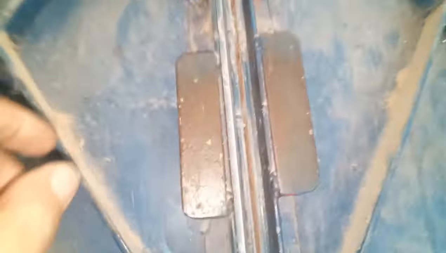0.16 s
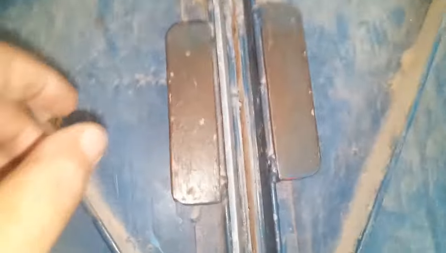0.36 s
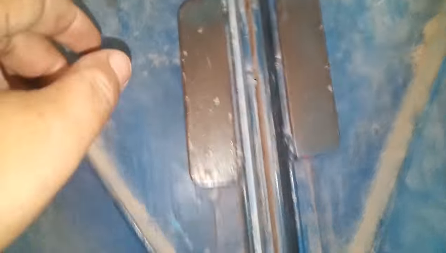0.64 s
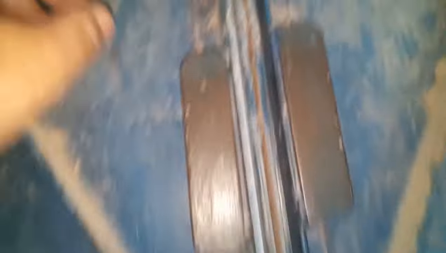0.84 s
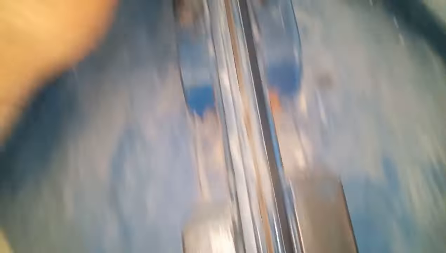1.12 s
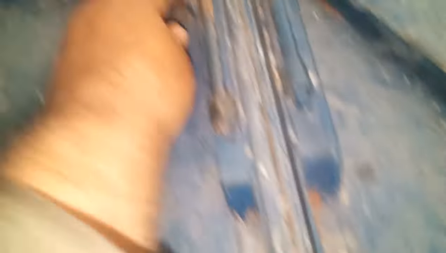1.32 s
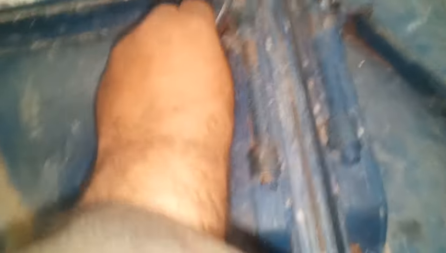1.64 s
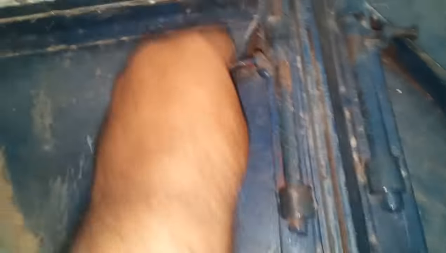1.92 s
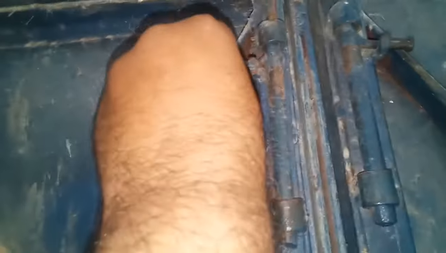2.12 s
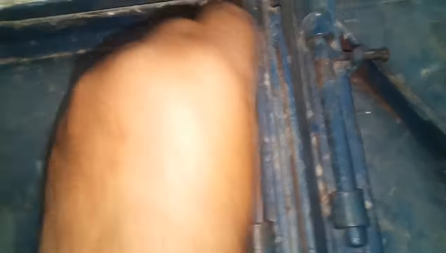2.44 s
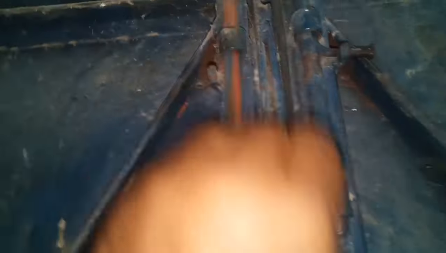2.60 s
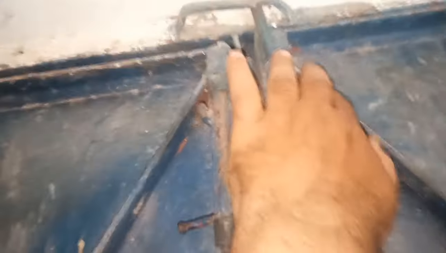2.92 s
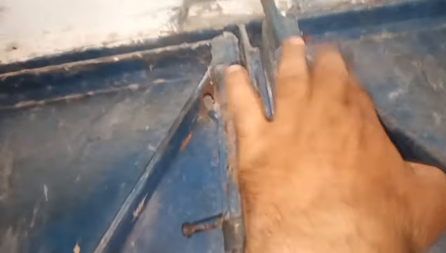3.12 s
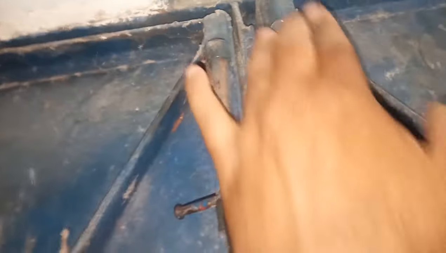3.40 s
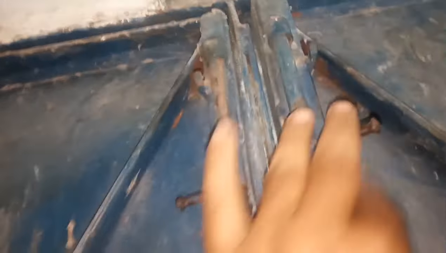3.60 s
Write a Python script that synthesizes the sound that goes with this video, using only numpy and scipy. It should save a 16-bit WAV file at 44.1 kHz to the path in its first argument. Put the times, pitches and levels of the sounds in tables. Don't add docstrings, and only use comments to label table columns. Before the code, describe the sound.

Rusty steel bolt on a sheet-metal door is knocked and scraped, rattling loudly with one squeal

```python
import sys
import numpy as np
from scipy import signal
from scipy.fft import rfft, irfft
from scipy.io import wavfile
from scipy.ndimage import uniform_filter1d, minimum_filter1d

SR = 44100
rng = np.random.default_rng(int(sys.argv[2]) if len(sys.argv) > 2 else 0)


def undo_db(level):
    steps = np.asarray(level, float) / 20
    return 10 ** steps


def wrap_up_sound(samples):
    columns = np.atleast_2d(samples).T
    tamed = np.clip(columns, -1, 1)
    steps = np.round(tamed * 32767).astype(np.int16)
    wavfile.write(sys.argv[1], SR, steps)


N = 165375
SCENE_CHANGE_S = 2.8105

# frequency in Hz, level in dB.
SHOP_TONE = [(40, -6), (100, 8), (300, -2), (1500, -8), (3600, -3), (5000, -18), (7000, -26), (16000, -28)]
# start in seconds, rise in seconds, hold in seconds,
# fall t60 in seconds, level in dB.
BRUSHES = [
    (.132, 0.0056, 0.033, 0.25, -56),
    (0.3548, 0.023, 0.016, 0.23, -32.5),
    (0.701, 0.042, 0.014, 0.18, -54),
    (0.85, 0.016, 0.092, 1.5, -64.5),
    (1.199, 0.0017, 0.016, 0.29, -40.5),
    (.59, .03, 0.05, 0.37, -68.5),
    (.156, 0.015, 0.084, 0.48, -40.5),
]
BRUSH_HZ = [2660, 3200, 1970, 3400, 2740, 2970, 2670]
# start in seconds, level in dB, pitch in Hz, t60 in seconds.
TAPS = [(0.231, -46, 163, 0.5), (.252, -44, 165, 0.6), (.252, -48, 600, .03), (0.599, -30, 420, 0.017),
        (0.635, -46, 220, .04), (.66, -53, 500, .02), (0.696, -53, 150, 0.05), (.735, -50.5, 300, 0.066),
        (.747, -47.5, 606, 0.048), (0.889, -49, 290, 0.037), (1.205, -49, 316, 0.42)]
# start in seconds, peak level in dB, rattle t60 in seconds,
# bass tilt in dB, treble tilt in dB.
BOLT_KNOCKS = [(1.443, -8, 0.39, 12.5, -15), (1.468, -8, 0.47, 10, -11), (1.545, -12, 0.19, 5, -1.5),
               (1.604, -5.5, 0.31, -2, 5), (1.634, -1, 0.21, -4.5, -23), (1.672, -8, 0.28, 5, -20),
               (1.739, -1.5, 0.17, -5.5, -10.5), (1.803, 2, 0.19, -2.5, 11), (1.831, -7, 0.26, 6, 16.5),
               (2.095, -3.5, 0.41, 3.5, 5.5), (2.173, -2, 0.16, -1.5, 16.5), (2.216, 3.5, 0.22, 1.5, 10.5),
               (2.47, -7, 0.17, -2.5, -8), (2.498, -8, 0.63, 0, -20.5), (2.609, -3.5, 0.3, -2, 0.5),
               (2.706, -1, 0.29, -22, 5.5), (2.718, -10.5, 0.24, -2, 28.5), (2.066, -44, .03, -10, 7.5)]
LEAF_KNOCKS = [
    (3.174, -1, 0.47, -6.5, -2.5),
    (3.2, -10.5, 0.98, 7, 4),
    (3.316, -5.5, 0.82, 3, -13.5),
    (3.383, -5.5, 0.25, 9, -27),
    (3.441, 0.5, 0.33, -3.5, -19),
    (3.487, -2.5, 0.13, -4, -18),
    (3.573, 0, 0.51, -1.5, 12),
]
# start in seconds, length in seconds, level in dB,
# bass tilt in dB, treble tilt in dB.
DRAGS = [(2.433, 0.04, -22, 0, -12), (2.612, 0.081, -8, 2, 4.5), (2.405, .04, -36, 6, -12),
         (3.32, .06, -17, 0, -6), (3.39, .045, -19, 0, -6), (2.47, .12, -23, 6.5, -6),
         (2.56, 0.058, -19, 7, -11), (1.446, .09, -14.5, 13.5, 4), (1.53, 0.066, -23, 4, 0),
         (2.708, .018, -10, -5.5, 6), (2.73, .09, -22, -3, 4), (2.225, 0.085, -20.5, 2.5, 3),
         (3.177, .04, -10.5, -6, 4), (3.45, .04, -17, -3, 2.5), (3.5, 0.045, -16, -5.5, -13),
         (1.33, 0.13, -43, 16.5, 13), (2.066, 0.03, -34, 26, -10), (3.149, .04, -33.5, 4, -15),
         (3.13, .03, -54, -6, -15), (2.95, .19, -58, 8, -17), (2.868, 0.1, -49, 6, -10),
         (3.0, 0.067, -50, 23, -15), (1.9, .17, -45, 24.5, -0.5)]
# start in seconds, level in dB, pitch in Hz, t60 in seconds.
FLEXES = [(1.447, -19, 168, 0.51), (1.448, -20.5, 400, .25), (1.81, -24, 163, .8), (2.225, -18, 272, .45),
          (2.27, -24.5, 165, .2), (2.465, -23.5, 268, 0.41), (2.59, -21, 265, .9), (2.645, -19, 265, .35),
          (1.61, -24, 765, .35), (1.675, -22, 770, .4), (2.47, -23, 745, .5), (3.38, -23, 265, .4),
          (2.9, -50, 165, 1.5), (2.6, -24.5, 166, 0.55), (2.73, -24.5, 165, 1), (3.316, -20.5, 262, 0.49),
          (2.38, -32, 105, .2), (2.1, -24, 320, .15), (1.545, -27, 90, 0.23), (1.74, -29, 90, 0.22)]
# frequency in Hz, level in dB, t60 in seconds.
BOLT_MODES = [(164.6, -4.5, 0.4), (233.6, -8, 0.28), (268, -3, 0.26), (326, -8, 0.09), (595, -18, 0.15),
              (725.4, -9.5, 0.13), (769.7, -6.5, 0.09), (1424, -17.5, .12), (1525, -19, .1),
              (1646, -19, 0.1), (2552, -20, 0.098), (3800, -16.5, 0.03), (8530, -17.5, 0.091),
              (13700, -24, .08)]
# frequency in Hz, level in dB, t60 in seconds.
LEAF_MODES = [(164, -7, 0.4), (264.2, -9, 0.15), (660, -14, 0.12), (1050, -6.5, 0.068), (1354, -23, 0.14),
              (1652, -12, 0.043), (2122, -21.5, 0.19), (2340, -13, 0.06), (2486, -12, 0.06),
              (2722, -16, 0.05), (2895, -17, 0.04), (4780, -20, 0.1), (7600, -24, .1)]
# frequency in Hz, level in dB.
BOLT_COLOUR = [(60, -29.5), (200, -8), (450, -6.5), (800, -4), (3300, -2), (4300, -10.5), (7500, -36.5),
               (14000, -70.5)]
# frequency in Hz, level in dB.
LEAF_COLOUR = [(60, -24), (250, -6), (420, -7.5), (1200, -6.5), (2700, -0.5), (5000, -13.5), (7000, -48),
               (14000, -58)]
# start in seconds, length in seconds, level in dB.
RUST_HISS = [
    (2.205, .115, -51),
    (2.62, .075, -50),
    (2.706, .07, -60),
    (1.445, .12, -62),
    (1.828, .05, -57),
    (2.74, .07, -64),
    (3.44, .11, -68),
]
# time in seconds, slip rate in Hz, level in dB.
SQUEAL_PATH = [
    (2.316, 3480, -60),
    (2.324, 3440, -19),
    (2.33, 3410, -24),
    (2.345, 3410, -9),
    (2.366, 3260, -15),
    (2.378, 3400, -14),
    (2.399, 3210, -12),
    (2.44, 3215, -22),
    (2.52, 3230, -36),
]
# frequency in Hz, level in dB, t60 in seconds.
SQUEAL_MODES = [(3376, 0, .5), (3212, -4, .3), (3050, -12, .2), (4550, 4, .1)]
OVERTONES_DB = [-19, -36, -29]


def level(x, db):
    return x * undo_db(db) / np.sqrt(np.mean(x ** 2) + 1e-30)


def colour(table, hz):
    points_hz, points_db = np.array(table).T
    return np.interp(np.log(hz), np.log(points_hz), points_db)


def band(x, lo_hz, hi_hz, order=2):
    return signal.sosfilt(signal.butter(order, [lo_hz, min(hi_hz, 20000)], "band", fs=SR, output="sos"), x)


def add(out, s, x):
    i = int(s * SR)
    end = int(SCENE_CHANGE_S * SR) + 900 if s < SCENE_CHANGE_S else N
    x = x[:end - i]
    out[i:i + len(x)] += x


def rattle(size):
    clicks_per_s, grain_db, grit_db = 2500, 2.5, -1.5
    hits = rng.random(size) < clicks_per_s / SR
    heights = undo_db(grain_db * np.minimum(rng.exponential(1, size), 3))
    clicks = hits * heights * rng.choice([-1, 1], size)
    return level(clicks, 0) + level(rng.standard_normal(size), grit_db)


def rings(hz, t60, size=16384):
    t = np.arange(size) / SR
    decay = np.exp(-np.log(1000) * t / t60[:, None])
    return np.sin(2 * np.pi * hz[:, None] * t) * decay / np.sqrt(t60[:, None])


def shop():
    hz = np.arange(N // 2 + 1) * SR / N + 1
    sway = level(band(rng.standard_normal(N), 55, 200), -54)
    sway *= np.clip((np.arange(N) / SR - 1.266) * 10, 0, 1)
    swell = undo_db(2 * level(uniform_filter1d(rng.standard_normal(N), 4000), 0))
    tone = level(irfft(rfft(rng.standard_normal(N)) * undo_db(colour(SHOP_TONE, hz)), N), 0)
    return swell * (undo_db(-70) * tone + sway)


def hand():
    out, t = np.zeros(N), np.arange(SR // 2) / SR
    phone_hz, phone_db = 3510, 1
    for (s, rise, hold, t60, db), hz in zip(BRUSHES, BRUSH_HZ):
        rub = rattle(len(t))
        hiss = band(rub, hz * .5, hz * 1.356, order=3)
        hiss += undo_db(phone_db) * band(rattle(len(t)), phone_hz * 0.826, phone_hz * 1.17, order=3)
        hiss += 0.027 * band(rub, 170, 5300) + 0.23 * band(rub, 550, 1400)
        stroke = np.minimum(t / rise, 1) ** 2 * undo_db(-60 * np.maximum(t - rise - hold, 0) / t60)
        add(out, s, level(hiss, db) * stroke)
    for s, db, hz, t60 in TAPS:
        thud = .5 * level(band(rng.standard_normal(len(t)), hz * .5, hz * 2), 0)
        ring = np.sin(2 * np.pi * hz * t) + thud
        add(out, s, undo_db(db - 60 * t / t60) * ring * np.minimum(t / .001, 1))
    return out


def steel(modes, spectrum, size=16384):
    detune, sheet_t60_s, scatter_db = .012, .035, 3
    bass_hz, treble_hz = 457, 8500
    mode_hz, mode_db, mode_t60 = np.array(modes).T
    hz = np.arange(size // 2 + 1) * SR / size + 1

    def contact(bass_db, treble_db):
        bank = rings(mode_hz * (1 + detune * rng.standard_normal(len(modes))), mode_t60)
        bank *= np.sqrt(mode_hz[:, None] / 1000 / np.sum(bank ** 2, axis=1, keepdims=True))
        sheet = rng.standard_normal(size) * undo_db(-60 * np.arange(size) / SR / sheet_t60_s)
        sheet[0] = np.sqrt(np.sum(sheet ** 2))
        ring = undo_db(mode_db + scatter_db * rng.standard_normal(len(bank))) @ bank
        ring += sheet * 3.6 / np.sqrt(np.sum(sheet ** 2))
        db = colour(spectrum, hz)
        db = db + bass_db / (1 + (hz / bass_hz) ** 4) + treble_db / (1 + (treble_hz / hz) ** 6)
        fold = irfft(db * np.log(10) / 20, size)
        fold[1:size // 2] *= 2
        fold[size // 2 + 1:] = 0
        return irfft(rfft(ring) * np.exp(rfft(fold)), size)
    return contact


def strike(out, force, body, s, db, tail=0):
    lowpass = signal.butter(2, 4750, fs=SR, output="sos")
    dull = signal.sosfilt(lowpass, tail * rattle(len(force)))
    x = signal.fftconvolve(force * rattle(len(force)) + dull, body)
    add(out, s, x * undo_db(db - 9) / np.sqrt(uniform_filter1d(x ** 2, 441).max()))


def knocks(out, rows, part):
    t = np.arange(SR // 2) / SR
    attack_s, blow_s = 0.0016, 0.0083
    rise = np.minimum(t / attack_s, 1)
    blow = rise * np.exp(-t / blow_s)
    for s, db, t60, bass_db, treble_db in rows:
        bite = level(band(rattle(len(t)), 3496, 4940), db - 19 + treble_db / 2)
        add(out, s, blow * bite)
        grit = level(band(rattle(len(t)), 7000, 16000), db - 57 + treble_db / 3)
        add(out, s, grit * (blow + 0.27 * undo_db(-60 * t / (.3 * t60))))
        force = undo_db(-4) * blow + rise * undo_db(-60 * t / (0.44 * t60))
        chatter = undo_db(-5.5 - 60 * t / (1.326 * t60))
        strike(out, force, part(bass_db, treble_db), s, db, chatter)


def drags(out, bolt, leaf):
    t = np.arange(SR // 2) / SR
    for s, length, db, bass_db, treble_db in DRAGS:
        force = np.sin(np.pi * np.clip(t / length, 0, 1)) ** 0.29 * (t < length)
        part = leaf if s > 3.1 else bolt
        strike(out, force, part(bass_db, treble_db), s, db + 7)


def flexes(out):
    t = np.arange(SR // 2) / SR
    rise_s, width = 0.011, 0.091
    for s, db, hz, t60 in FLEXES:
        rough = level(band(rattle(len(t)), hz * (1 - width), hz * (1 + width)), -4)
        boom = np.sin(2 * np.pi * hz * t) + rough
        add(out, s, boom * np.minimum(t / rise_s, 1) * undo_db(db - 60 * t / t60))


def door():
    out = np.zeros(N)
    bolt, leaf = steel(BOLT_MODES, BOLT_COLOUR), steel(LEAF_MODES, LEAF_COLOUR)
    knocks(out, BOLT_KNOCKS, bolt)
    knocks(out, LEAF_KNOCKS, leaf)
    drags(out, bolt, leaf)
    flexes(out)
    return out


def rust():
    out, t = np.zeros(N), np.arange(SR // 4) / SR
    for s, length, db in RUST_HISS:
        hiss = band(rattle(len(t)), 9900, 17000) + .3 * band(rattle(len(t)), 6500, 9300)
        speed = np.sin(np.pi * np.clip(t / length, 0, 1)) ** 1.2
        add(out, s, level(hiss, db) * speed)
    return out


def squeal():
    jitter, flutter_db, direct_db = .02, 2.5, 5
    t = np.arange(N) / SR
    path_s, path_hz, path_db = np.array(SQUEAL_PATH).T
    mode_hz, mode_db, mode_t60 = np.array(SQUEAL_MODES).T
    wobble = level(band(rng.standard_normal(N), 15, 220, order=3), 0)
    flutter = flutter_db * level(band(rng.standard_normal(N), 30, 160, order=3), 0)
    rate_hz = np.interp(t, path_s, path_hz) * (1 + jitter * wobble)
    swing = undo_db(np.interp(t, path_s, path_db, -120, -120) + flutter)
    slip = swing * np.sin(np.cumsum(2 * np.pi * rate_hz / SR))
    rung = signal.fftconvolve(slip, undo_db(mode_db) @ rings(mode_hz, mode_t60))[:N]
    z = signal.hilbert(undo_db(direct_db) * slip + rung * np.std(slip) / np.std(rung))
    out = z.real
    for k, db in enumerate(OVERTONES_DB):
        out = out + undo_db(db) * (z * (z / (np.abs(z) + 0.34)) ** (k + 1)).real
    return out


def room(near):
    t = np.arange(SR // 2) / SR
    t60_s, echo_db = 0.12, -25
    tail = rng.standard_normal(len(t)) * undo_db(-60 * t / t60_s) * (t > .004)
    echo = level(tail, echo_db) / np.sqrt(len(t))
    return signal.fftconvolve(near, echo)[:N]


def scene():
    near = door() + rust() + squeal() + hand()
    return (near + room(near) + shop())[None]


def top_cut(x):
    return signal.sosfilt(signal.butter(12, 16120, fs=SR, output="sos"), x)


def record(dry):
    silent_s, fade_in_s, leak_db = 0.055, 0.041, -71
    limit, limit_s = .86, .004
    t = np.arange(N) / SR - SCENE_CHANGE_S
    fade_in = np.clip((t - silent_s) / fade_in_s, 0, 1)
    stop = np.clip(-t * 3000, 0, 1)
    leak = undo_db(leak_db - 400 * np.abs(t))
    gate = np.maximum(np.maximum(fade_in, stop), leak)
    x = signal.sosfilt(signal.butter(2, 65, "high", fs=SR, output="sos"), dry) * gate
    x = signal.sosfilt(signal.ellip(8, .2, 60, 15600, fs=SR, output="sos"), x)
    span = int(limit_s * SR)
    gain = np.minimum(1, limit / (np.abs(x) + 1e-9))
    gain = uniform_filter1d(minimum_filter1d(gain, 2 * span), span)
    return top_cut(x * gain)


dry = scene()
out = record(dry)
wrap_up_sound(out)
```